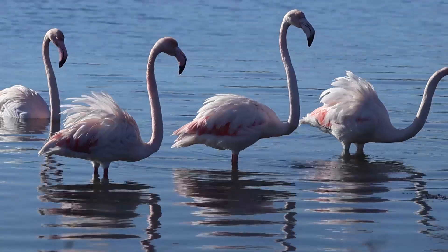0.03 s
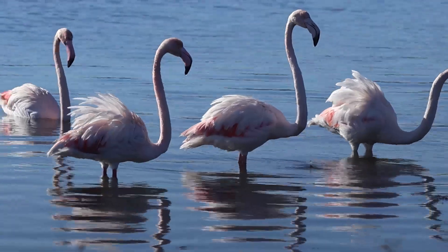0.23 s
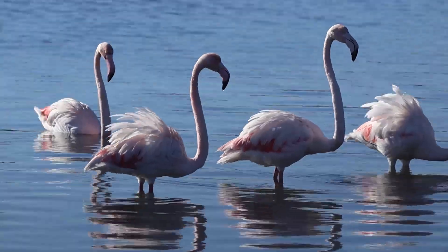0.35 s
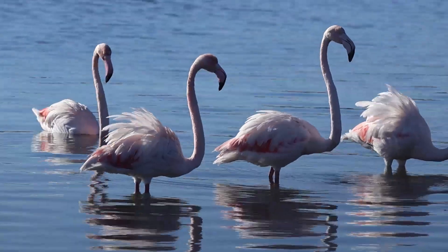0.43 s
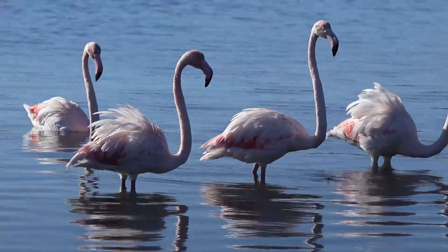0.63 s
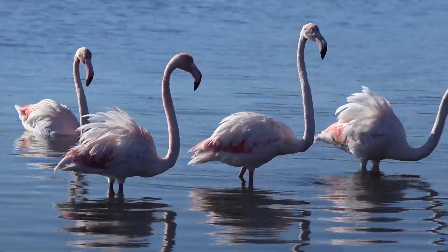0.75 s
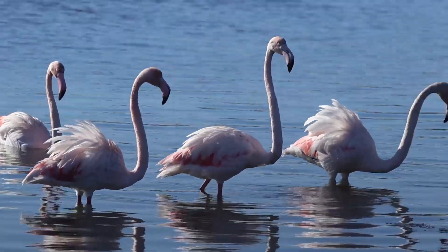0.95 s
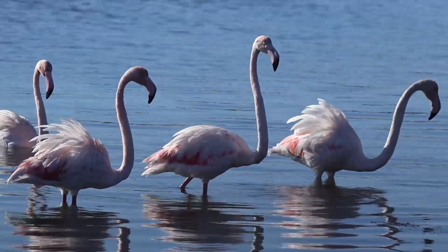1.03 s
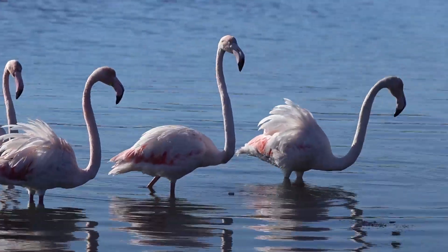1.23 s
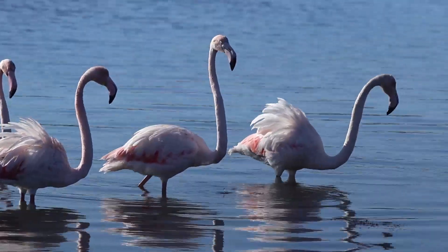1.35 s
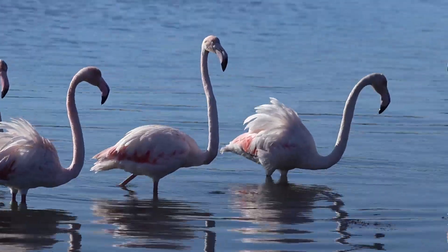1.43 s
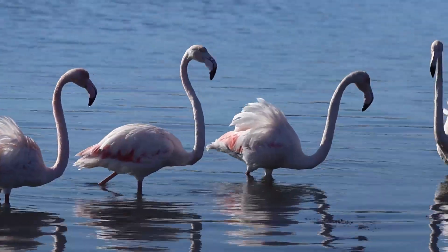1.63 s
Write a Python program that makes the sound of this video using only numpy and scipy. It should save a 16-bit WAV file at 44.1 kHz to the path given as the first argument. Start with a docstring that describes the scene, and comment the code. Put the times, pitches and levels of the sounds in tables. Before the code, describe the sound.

A flamingo gives a close rattling grunt that breaks into a loud honk. Soft sloshes and hollow knocks follow, then another flamingo rasps and a quiet grunt answers, over light wind on a shallow lagoon.

```python
"""A shallow lagoon, where flamingos wade and call over light wind and the far flock.
There are rattling grunts, one of which breaks into a loud honk, and a rasping call.
Each call is a quick run of short bursts that ring in the bird's throat and echo faintly
across the water. Hollow knocks, soft sloshes and ticks lie between the calls."""
import sys
import numpy as np
from scipy import signal
from scipy.fft import rfft, irfft
from scipy.io import wavfile

SR = 44100
rng = np.random.default_rng(int(sys.argv[2]) if len(sys.argv) > 2 else 0)


def wav_out(sig):
    """Save sig, one row per channel (or a flat mono array), as 16-bit PCM at SR to the path in sys.argv[1]."""
    wavfile.write(sys.argv[1], SR, np.round(np.clip(np.atleast_2d(sig).T, -1, 1) * 32767).astype(np.int16))


N = 74970
TIME = np.arange(N) / SR
BURST_TIME = np.arange(1024) / SR


def from_db(db):
    """Turn decibels into a number to multiply by."""
    return 10 ** (np.asarray(db) / 20)


def rms_one(x):
    """Scale a sound so that its average strength (rms) is 1."""
    return x / np.sqrt(np.mean(x ** 2) + 1e-20)


def add(track, start_s, sound):
    """Mix a short sound into a track."""
    i = max(int(start_s * SR), 0)
    track[i:i + len(sound)] += sound[:max(N - i, 0)]


def pan(x, left_db):
    """Make the left side louder than the right, or quieter if left_db is negative."""
    return x * from_db([[left_db / 2], [-left_db / 2]])


def lowpass(x, hz, order=2):
    """Dull a sound by turning down what lies above hz."""
    return signal.sosfilt(signal.butter(order, hz, fs=SR, output="sos"), x)


def waver(rate_hz):
    """A random wobble of strength 1; a higher rate makes it quicker."""
    return rms_one(lowpass(rng.standard_normal(N), rate_hz))


def swell(peak_s, half_s):
    """A smooth rise and fall around a moment."""
    return np.exp(-.5 * ((TIME - peak_s) / half_s) ** 2)


def resonate(x, resonances):
    """Keep a band of sound around each resonance (a pitch that rings) and add the bands up."""
    out = 0
    for hz, width, db in resonances:
        r = np.exp(-np.pi * width / SR)
        band = [(1 - r * r) / 2, 0, (r * r - 1) / 2, 1, -2 * r * np.cos(2 * np.pi * hz / SR), r * r]
        out = out + from_db(db) * signal.sosfilt([band, band], x)  # twice, for steeper edges
    return out


def crack(decay_s):
    """A very short burst of noise that dies away."""
    x = rng.standard_normal(len(BURST_TIME)) * np.exp(-BURST_TIME / decay_s)
    return x / np.linalg.norm(x)


# How alike the two ears are. Each row: frequency in Hz, likeness (1 the same, -1 opposite).
EAR_LIKENESS = [(30, 1), (90, 0.54), (300, 0.52), (2500, -0.042), (5000, -0.28), (9000, -0.68)]

def noise(spectrum):
    """Stereo noise with a given tone colour, centred in the bass and wide in the treble."""
    log_hz = np.log(np.arange(N // 2 + 1) * SR / N + 1)
    curves = (np.transpose(spectrum), np.transpose(EAR_LIKENESS))
    colour_db, alike = (np.interp(log_hz, np.log(hz), values) for hz, values in curves)
    shared, opposite = rfft(rng.standard_normal((2, N))) * from_db(colour_db)
    ears = np.sqrt(1 + alike) * shared + np.sqrt(1 - alike) * opposite * [[1], [-1]]
    return rms_one(irfft(ears, N))


# The tone colour of wind and water. Each row: frequency in Hz, relative level in dB.
WIND_COLOUR = [(20, -48), (33, -18), (55, 0), (130, -2.5), (300, -6.5), (520, -12), (1050, -12),
               (1800, -20), (3300, -25.5), (5200, -22.5), (8000, -25.5), (15500, -28.5)]
# How loud they are. Each row: time in seconds, level in dB.
WIND_LEVELS = [(0, -49.5), (.4, -45.5), (1.1, -49.5), (1.7, -46.5)]

def wind_and_water():
    """Light wind and water make a low rush that gently rises and falls."""
    return from_db(np.interp(TIME, *np.transpose(WIND_LEVELS))) * noise(WIND_COLOUR)


# First a low hum under the honk, then two notes from distant birds.
# Each row: loudest moment in seconds, half-length in seconds, pitch in Hz, level in dB.
FAINT_NOTES = [(0.467, .035, 313.3, -49.5), (0.594, 0.058, 1000, -51.5), (1.34, 0.076, 302, -51)]

def faint_notes(waver_hz=3.5):
    """A faint low hum under the honk, then two thin notes from distant birds; all waver a little."""
    out = 0
    for peak_s, half_s, hz, db in FAINT_NOTES:
        pitch = hz + waver_hz * waver(rate_hz=14)
        tone = rms_one(np.sin(2 * np.pi * np.cumsum(pitch) / SR))
        out = out + from_db(db) * swell(peak_s, half_s) * tone
    return out


def lagoon_echo(x):
    """Sound scatters quickly off the ripples and comes back long and dull from the shore."""
    out = 0
    for db, fade_s in ((-14, .115), (-20, 1)):  # ripples, then shore
        fade = from_db(-60 * TIME / fade_s)
        tail = lowpass(rng.standard_normal((2, N)), hz=4700) * fade / np.linalg.norm(fade)
        out = out + from_db(db) * signal.fftconvolve(x, tail, axes=1)[:, :N]
    return out


# Small splashes. Each row: start in seconds, relative level in dB.
SPLASH_TICKS = [(.8025, -31), (.813, -35), (.8212, -33), (.9335, -35), (1.1148, -37.5)]

def splash_ticks():
    """Each small splash is a sharp tick that trails off in fizz."""
    out = np.zeros(N)
    for start_s, db in SPLASH_TICKS:
        tick, fizz = crack(decay_s=.0002), crack(decay_s=.006)
        add(out, start_s, from_db(db + 10) * (tick + .55 * fizz))
    return lowpass(out, hz=11000, order=1)


# Plops in the strongest slosh. Each row: start in seconds, level in dB.
WATER_PLOPS = [(0.918, -15), (0.9259, -28), (0.9334, -10.5)]

def plops(hz=210, width_hz=320):
    """Each plop is one pulse ringing briefly at a low pitch."""
    thump = resonate(signal.unit_impulse(len(BURST_TIME)), [(hz, width_hz, 0)])
    thump /= np.linalg.norm(thump)
    out = np.zeros(N)
    for start_s, db in WATER_PLOPS:
        add(out, start_s, from_db(db) * thump)
    return out


# Each row: loudest moment in seconds, half-length in seconds, body level in dB, spray level in dB.
FOOT_SLOSHES = [(0.243, 0.021, -43.5, -74), (0.366, 0.032, -39, -48.5), (0.822, 0.026, -40, -46.5),
                (0.934, 0.025, -37.5, -44.5), (1.055, 0.017, -41, -45.5), (1.109, 0.011, -49.5, -58.5),
                (1.218, 0.048, -43.5, -51.5)]
# The tone colours of a slosh's dull body and its spray. Each row: frequency in Hz, relative level in dB.
BODY_COLOUR = [(60, -16.5), (130, -6), (330, -3.5), (520, -13), (1300, -17.5), (2500, -27.5), (6000, -78)]
SPRAY_COLOUR = [(500, -21), (2000, -2), (3200, -11), (4500, -3), (7000, -14), (12000, -15.5), (16000, -19)]

def sloshes(grain_db=5):
    """Wading feet push the water into dull sloshes, with spray that breaks into fine drops."""
    body = sum(from_db(db) * swell(peak_s, half_s) for peak_s, half_s, db, _ in FOOT_SLOSHES)
    spray = sum(from_db(db) * swell(peak_s, half_s) for peak_s, half_s, _, db in FOOT_SLOSHES)
    drops = rms_one(from_db(grain_db * waver(rate_hz=700)))
    return body * noise(BODY_COLOUR) + spray * drops * noise(SPRAY_COLOUR)


# Each row: start in seconds, relative level of the ring in dB, relative level of the click in dB.
HOLLOW_KNOCKS = [(.4442, -14.5, -36), (0.5229, -17.5, -27.5), (0.964, -18.5, -31), (0.9971, -17.5, -26),
                 (1.0439, -17.5, -30.5), (1.057, -28, -27.5)]
# The tones of the ring. Each row: pitch in Hz, relative level in dB, seconds to fade by 60 dB.
RING_TONES = [(760, -5, 0.033), (950, -16.5, 0.067), (1221, -3, 0.024), (1507, -6, 0.041),
              (1780, -15, 0.035)]
# The bands of the click. Each row: frequency in Hz, width in Hz, relative level in dB.
CLICK_BANDS = [(2300, 2400, 5.5), (4580, 1300, 4), (8440, 8600, -15.5)]

def knocks(attack_s=.0009, roughness=.6, ear_lag_radians=1.4):
    """A click and a short, rough, hollow ring, off to the right and out of step at the two ears."""
    out, t = np.zeros((2, N)), TIME[:SR // 10]
    for start_s, ring_db, click_db in HOLLOW_KNOCKS:
        for hz, tone_db, fade_s in RING_TONES:
            pitch = hz * (1 + .042 * rng.normal())
            phase = 2 * np.pi * (pitch * t + rng.random())
            phase += roughness * waver(rate_hz=170)[:len(t)]
            fade = from_db(ring_db + tone_db - 3.5 - 60 * t / fade_s)
            loudness = fade * (1 - np.exp(-t / attack_s))
            add(out[0], start_s, loudness * np.sin(phase - ear_lag_radians))
            add(out[1], start_s, loudness * np.sin(phase))
        for ear in out:
            click = resonate(crack(decay_s=.0012), CLICK_BANDS)
            add(ear, start_s, from_db(click_db + 13.5) * click)
    return pan(out, left_db=-3.5)


PUFF_PEAK_S = .006  # how far into a burst the puff is strongest
CLEAN_WIDTH_HZ = 470  # narrower resonances ring as a tone, wider ones hiss

def throat_burst(throat, rough, puff_s):
    """One puff of air sets the throat ringing: part clear tone, part hiss of swirling air."""
    t, out = BURST_TIME - PUFF_PEAK_S, 0
    half_s = puff_s * (1 + .15 * np.sign(t))  # quick to open, slower to close
    puff = np.exp(-.5 * (t / half_s) ** 2)
    for hz, width, db in throat:
        pitch = hz * (1 + .02 * rng.normal())
        tone = np.sin(2 * np.pi * (pitch * t + rng.random()))
        swirl = rng.standard_normal(len(t))
        clean, hiss = (rms_one(resonate(puff * x, [(hz, width, 0)])) for x in (tone, swirl))
        clean_share = np.exp(-(width / CLEAN_WIDTH_HZ) ** 2)
        out = out + from_db(db) * rms_one(clean_share * clean + rough * hiss)
    return rms_one(out)


# The resonances move as the neck stretches. Each row: time in seconds, frequency multiplier.
NECK_STRETCH = [(.245, 1.011), (.33, 1.005), (.47, 1.018), (1.2, 0.993), (1.36, 1.022)]

def call(effort, throat, rough, puff_s, lead_s, rebound_s, rebound_db, uneven=1):
    """A run of bursts whose speed and level follow the bird's effort; a rebound follows each one."""
    times, rates, levels = np.transpose(effort)
    spread_db, jitter_s = .8 * uneven, .0002 * uneven
    out, now = np.zeros(N), times[0]
    while now <= times[-1]:
        stretch = np.interp(now, *np.transpose(NECK_STRETCH))
        stretched = [(hz * stretch, width, db) for hz, width, db in throat]
        rebound_lag = rebound_s * (1 + .1 * rng.normal())
        for lag, db in ((0, 0), (rebound_lag, rebound_db)):
            level_db = np.interp(now, times, levels) + db + spread_db * rng.normal()
            start_s = now + lag - lead_s - PUFF_PEAK_S + jitter_s * rng.normal()
            add(out, start_s, from_db(level_db) * throat_burst(stretched, rough, puff_s))
        now += 1 / np.interp(now, times, rates)
    return out


# One list for each soft grunt. Each row: time in seconds, bursts per second, level in dB.
SOFT_EFFORTS = [
    [(.8472, 77.2, -49), (.874, 75, -48), (.906, 77, -52)],
    [(1.5652, 74.2, -42.5), (1.592, 76.3, -45), (1.619, 75.2, -50), (1.637, 72, -74)],
]
# The throat's resonances. Each row: frequency in Hz, width in Hz, relative level in dB.
SOFT_RESONANCES = [(1146, 434, 6.5), (2107, 470, 7.5), (4200, 370, -12.5), (5900, 370, -21)]

def soft_grunts():
    """Two quiet answers, made of smoother bursts with little hiss."""
    return sum(call(effort, SOFT_RESONANCES, rough=.35, puff_s=.00093, lead_s=.0009,
                    rebound_s=.004, rebound_db=-8.5) for effort in SOFT_EFFORTS)


# The rasp's opening, then the rest. Each row: time in seconds, bursts per second, level in dB.
RASP_OPENING = [(1.1915, 70, -47.5)]
RASP_EFFORT = [(1.2151, 72.9, -47.5), (1.268, 72.76, -47), (1.297, 85.7, -45.5), (1.335, 99.6, -48.5),
               (1.352, 102.9, -45), (1.371, 105, -39.5), (1.391, 95.3, -50), (1.429, 60.5, -60)]
# The throat's resonances. Each row: frequency in Hz, width in Hz, relative level in dB.
RASP_RESONANCES = [(828, 320, -1), (1120, 360, -0.5), (2133, 355, 5), (2780, 77, -12), (3490, 800, -5.5),
                   (4450, 460, -4), (5440, 320, -14)]

def rasp():
    """Another bird answers with uneven, hissy bursts, each doubled by a strong rebound."""
    voice = sum(call(effort, RASP_RESONANCES, rough=1.2, puff_s=.0006, lead_s=.0005, rebound_s=.004,
                     rebound_db=-.5, uneven=2.3) for effort in (RASP_OPENING, RASP_EFFORT))
    return pan(voice, left_db=-.8)


# The near bird's grunt. Each row: time in seconds, bursts per second, level in dB.
GRUNT_EFFORT = [(.2195, 79.3, -42), (.234, 62.8, -43), (.2475, 70, -31), (.262, 70.2, -34.5),
                (.304, 70.4, -29.5), (.319, 75.7, -33.5), (.361, 70.7, -30.5), (.389, 64.5, -34),
                (.408, 48, -30)]
# The throat's resonances. Each row: frequency in Hz, width in Hz, relative level in dB.
GRUNT_RESONANCES = [(660, 620, -13), (1093, 243, 0.5), (2203, 330, 5), (2830, 280, -8.5), (4050, 470, -15),
                    (5330, 820, -21.5), (8150, 2500, -34)]

def grunt():
    """The near bird's bursts come slowly enough to rattle."""
    return call(GRUNT_EFFORT, GRUNT_RESONANCES, rough=.7, puff_s=.0015, lead_s=.0008,
                rebound_s=.0074, rebound_db=-11.5)


# The near bird's honk. Each row: time in seconds, bursts per second, level in dB.
HONK_EFFORT = [(.4162, 101.6, -28.5), (.445, 105.9, -26.5), (.463, 107.5, -29), (.473, 110.9, -31.5),
               (.486, 97.8, -48)]
# The throat's resonances. Each row: frequency in Hz, width in Hz, relative level in dB.
HONK_RESONANCES = [(700, 710, -13), (1135, 200, -8.5), (2316, 317, 0.5), (2760, 300, -19), (3700, 400, -17),
                   (4740, 1200, -24.5), (7900, 2600, -31), (12200, 4900, -41)]

def honk():
    """The grunt breaks into a loud honk as the bursts get faster and cleaner."""
    return call(HONK_EFFORT, HONK_RESONANCES, rough=.5, puff_s=.0011, lead_s=.0016,
                rebound_s=.006, rebound_db=-15.5)


def scene():
    """Wind, faint notes and wading lie behind the calls and knocks, which echo over the lagoon."""
    background = wind_and_water() + faint_notes()
    wading = splash_ticks() + plops() + sloshes()
    near = knocks() + soft_grunts() + rasp() + grunt() + honk()
    return background + wading + lagoon_echo(near) + near


# The band where the two microphones differ. Each row: frequency in Hz, width in Hz, level in dB.
MICROPHONE_MISMATCH = [(3080, 170, 6.5)]

def record(dry, cutoff_hz=15850):
    """Two microphones colour left and right differently; the highest treble is cut steeply."""
    mismatch = resonate(dry.mean(axis=0), MICROPHONE_MISMATCH) * np.array([[1], [-1]])
    treble_cut = signal.ellip(12, .1, 80, cutoff_hz, fs=SR, output="sos")
    return signal.sosfilt(treble_cut, dry + mismatch)


dry = scene()
out = record(dry)
wav_out(out)
```